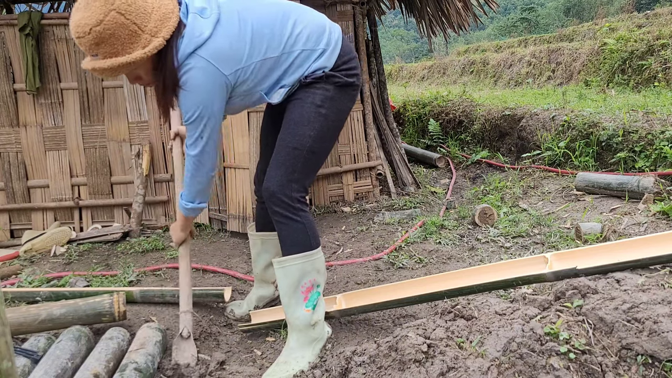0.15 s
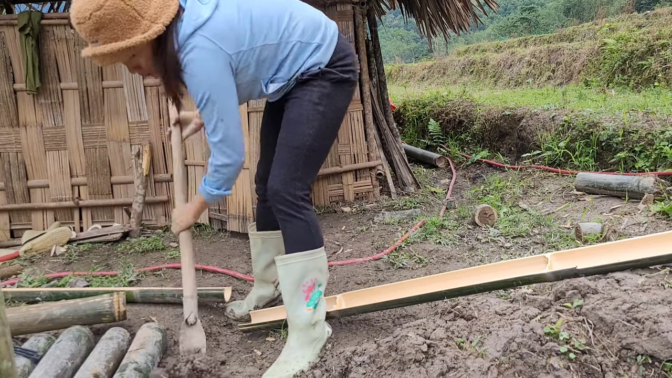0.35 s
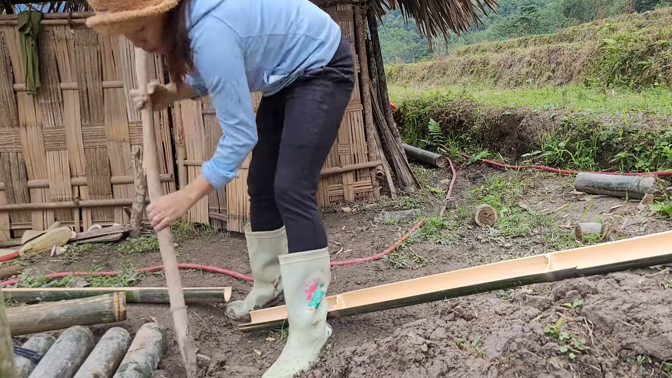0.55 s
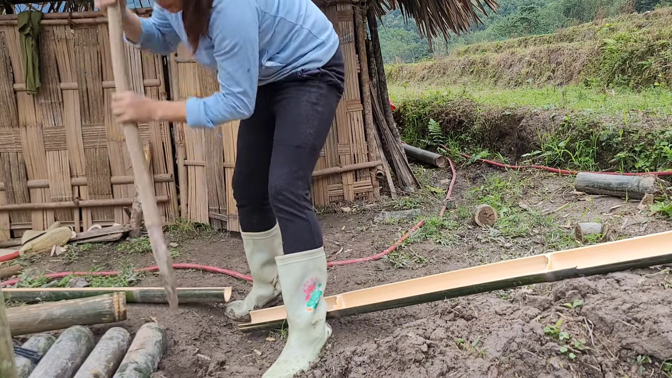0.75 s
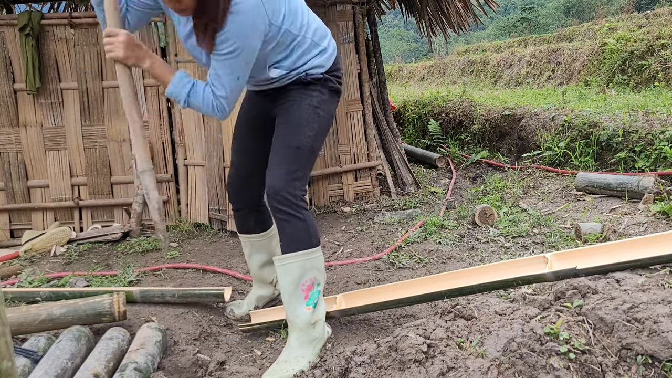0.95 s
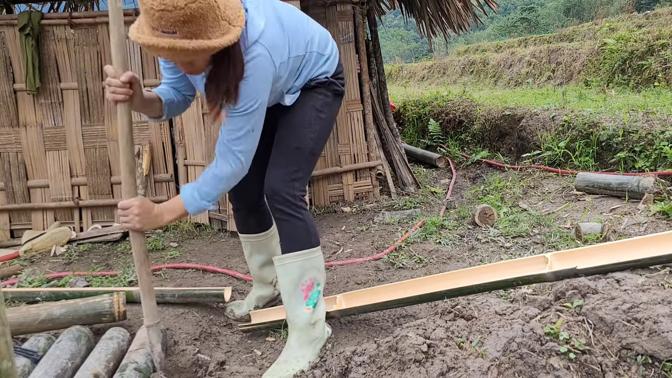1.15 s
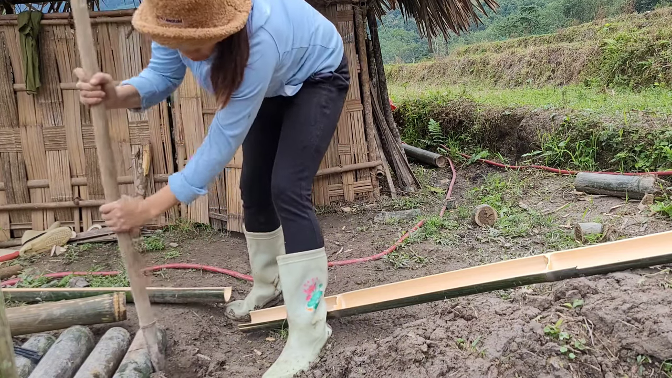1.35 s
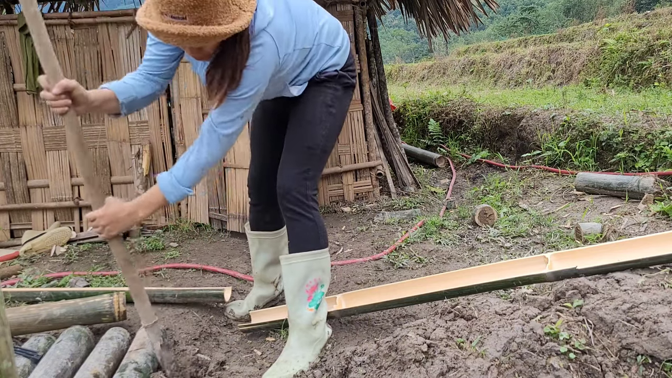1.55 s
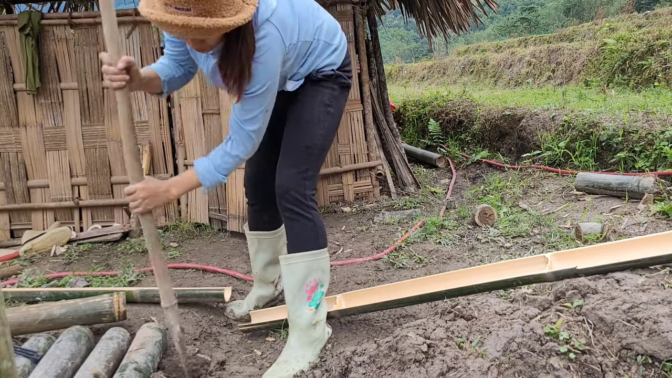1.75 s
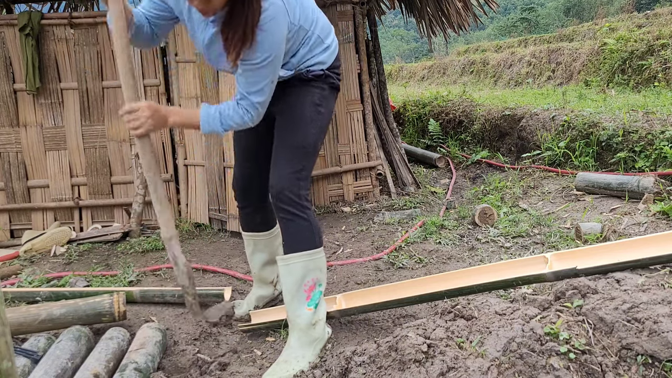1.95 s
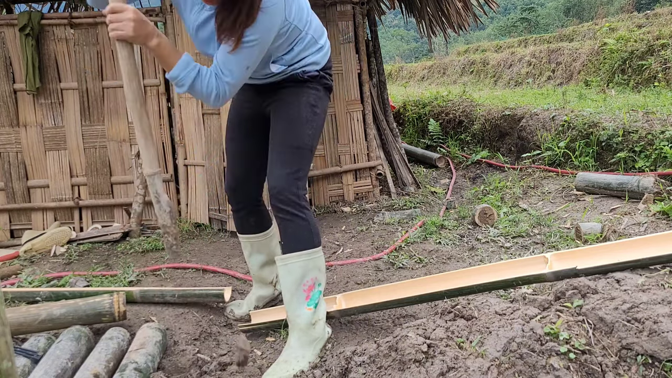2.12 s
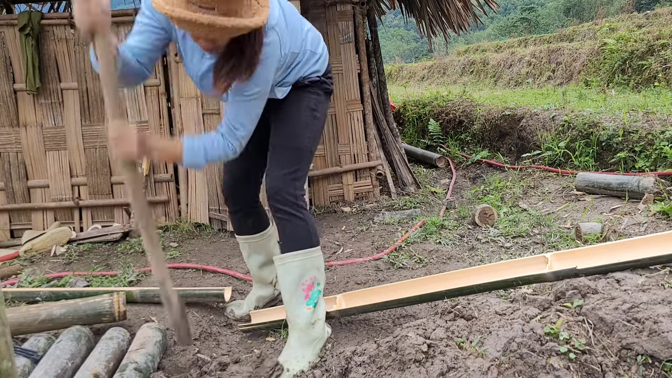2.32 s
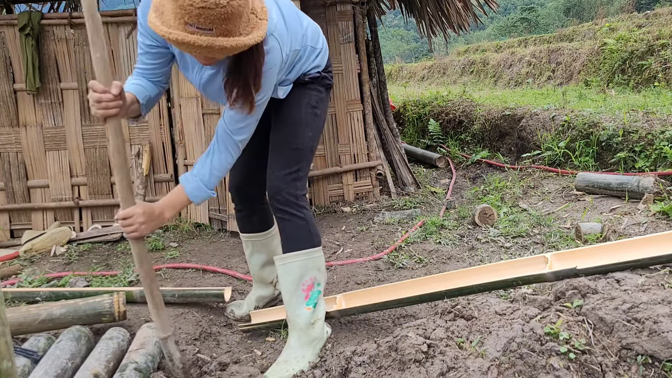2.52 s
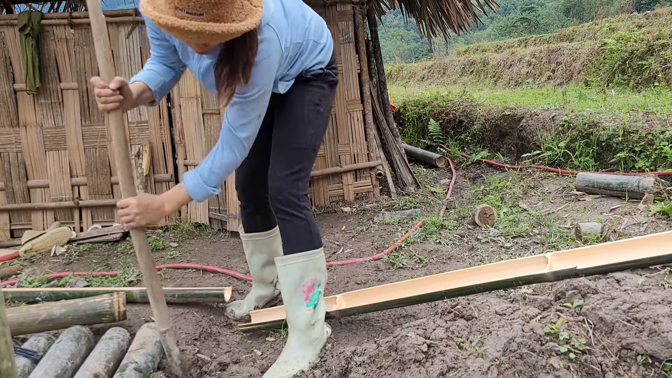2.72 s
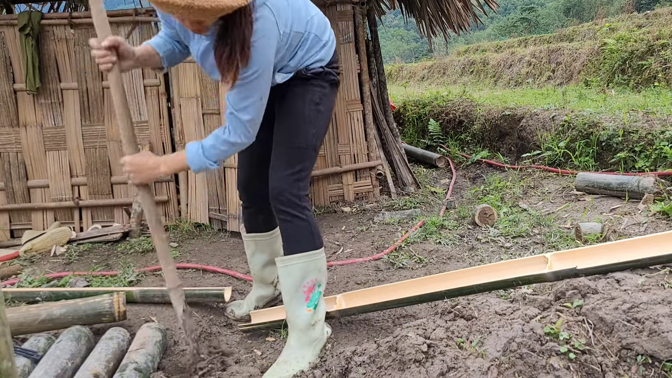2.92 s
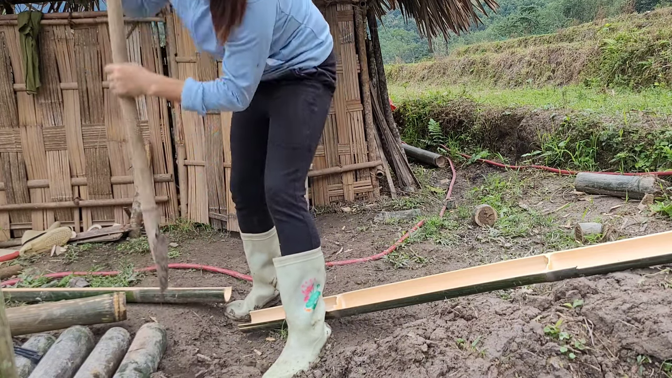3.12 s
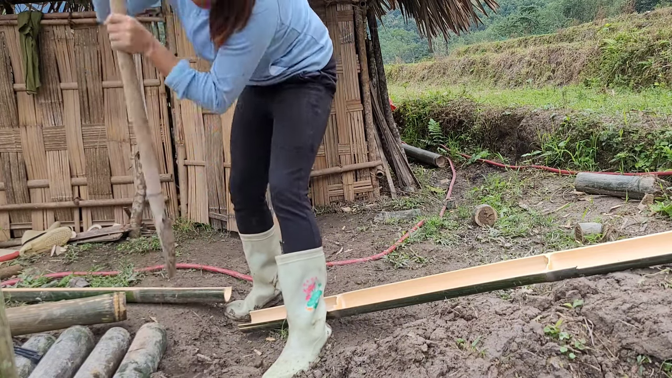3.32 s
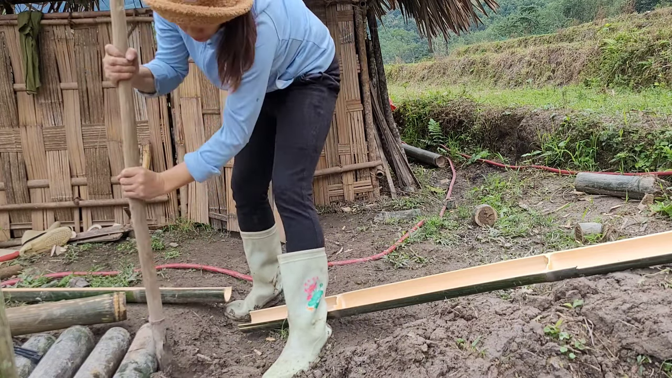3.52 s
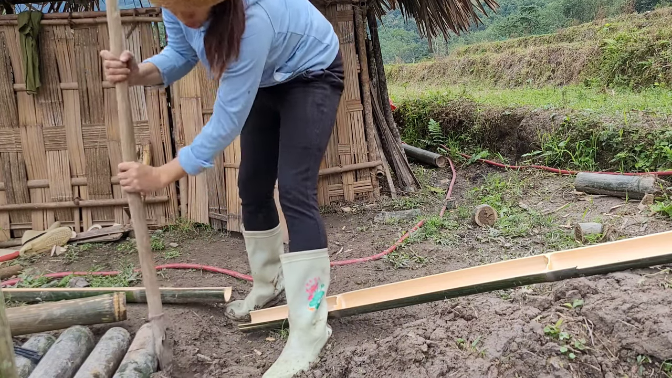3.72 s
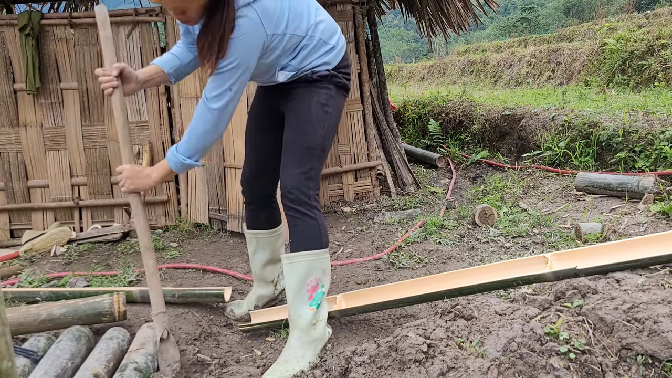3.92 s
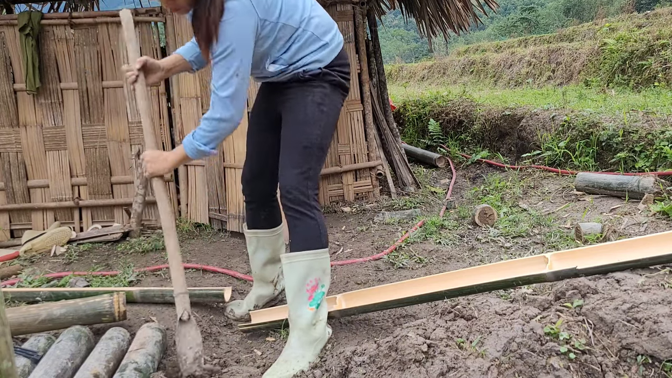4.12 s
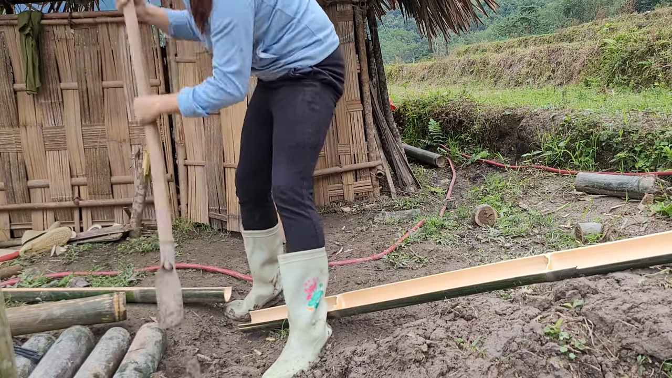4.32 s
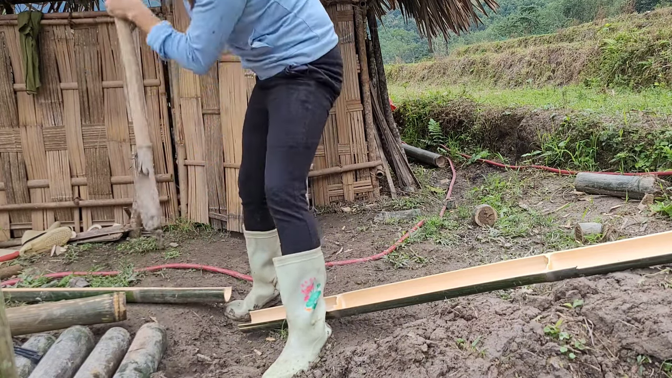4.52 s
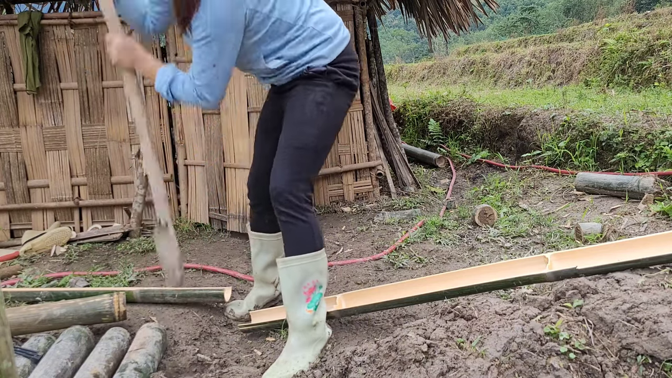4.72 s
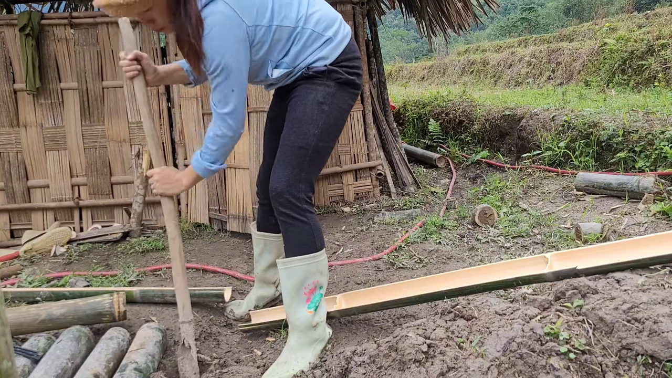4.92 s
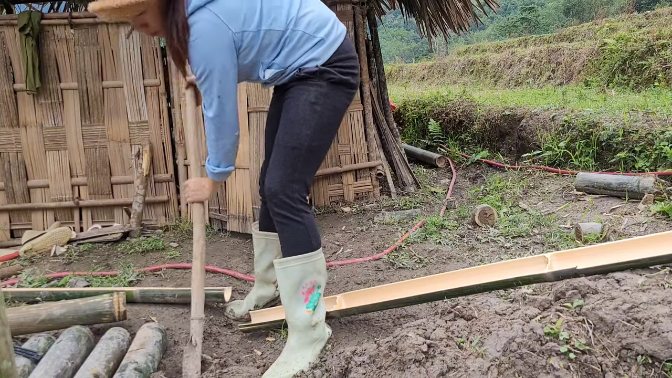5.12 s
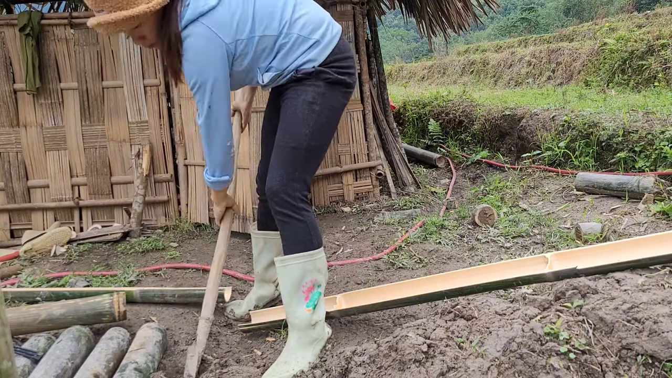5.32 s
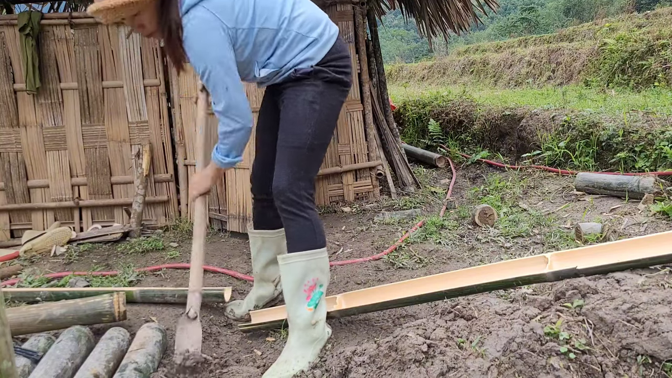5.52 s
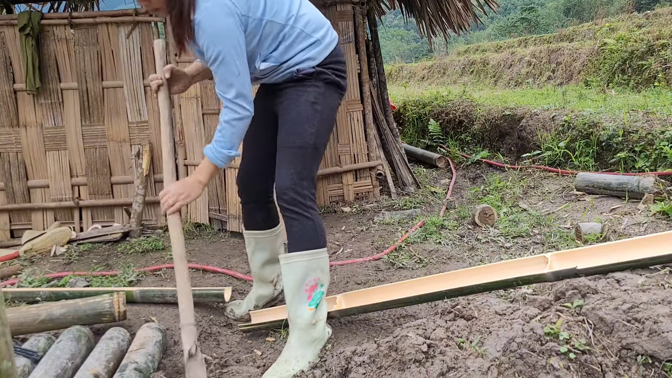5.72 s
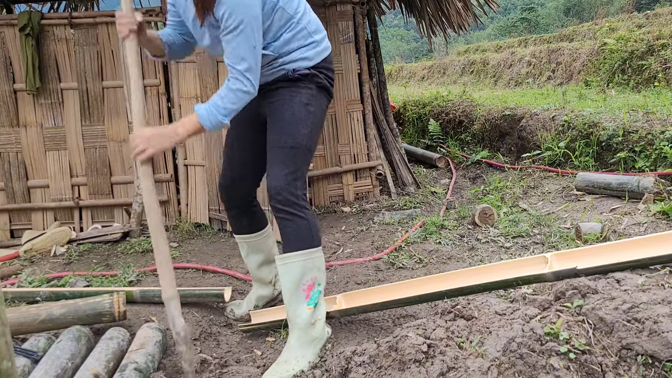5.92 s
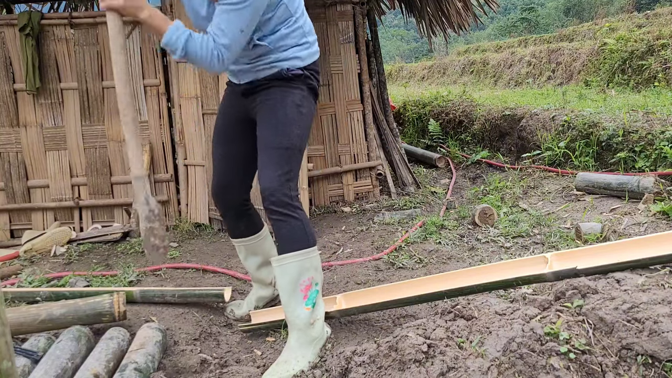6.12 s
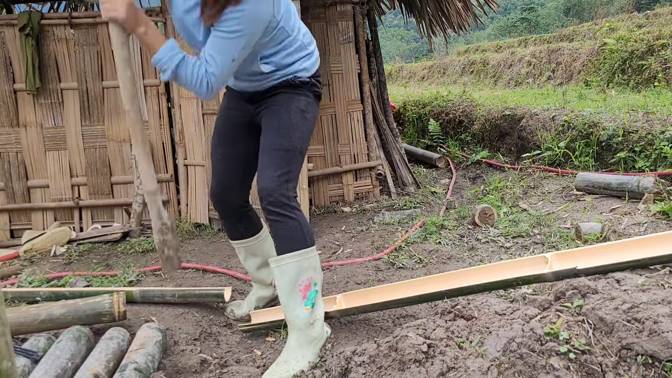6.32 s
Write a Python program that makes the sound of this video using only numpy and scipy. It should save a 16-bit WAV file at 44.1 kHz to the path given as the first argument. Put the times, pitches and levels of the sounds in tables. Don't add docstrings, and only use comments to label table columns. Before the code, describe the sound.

A digging bar is stabbed four times into damp soil with crunchy thuds and woody knocks, crumbs scattering, while a distant engine drones outdoors.

```python
import sys
import numpy as np
from scipy import signal
from scipy.fft import rfft, irfft, next_fast_len
from scipy.io import wavfile
from scipy.ndimage import uniform_filter1d, map_coordinates

SR = 44100
rng = np.random.default_rng(int(sys.argv[2]) if len(sys.argv) > 2 else 0)


def elevation(decibels):
    levels = np.asarray(decibels, float)
    return 10 ** (levels / 20)


def dump(signal):
    limited = np.clip(np.atleast_2d(signal).T, -1, 1)
    pcm = np.round(limited * 32767).astype(np.int16)
    wavfile.write(sys.argv[1], SR, pcm)


N = 280035


def unit(x):
    return x / np.sqrt(np.mean(x ** 2) + 1e-20)


def along(points, hz):
    f, v = np.transpose(points)
    return np.interp(np.log(hz + 1), np.log(f + 1), v)


def curves(rows):
    s, *cols = np.transpose(rows)
    return [np.interp(np.arange(N) / SR, s, c) for c in cols]


def wobble(rate, size=N):
    knots = rng.standard_normal(int(size * rate / SR) + 4)
    return map_coordinates(knots, [np.arange(size) * rate / SR])


def filtered(x, response):
    size = x.shape[-1]
    m = next_fast_len(size + min(4096, size))
    return irfft(rfft(x, m) * response(np.fft.rfftfreq(m, 1 / SR)), m)[..., :size]


def lead(x, samples):
    sides = np.array([[1], [-1]])
    return filtered(x, lambda hz: np.exp(1j * np.pi * hz * samples / SR * sides))


def rush(spectrum, alike, size, grit_db):
    roughness = unit(uniform_filter1d(rng.standard_normal(size), size=24))
    grit = elevation(grit_db * np.clip(roughness, -3, 3))
    pair = grit * rng.standard_normal((2, size))

    def mid_side(hz):
        turn = np.arccos(np.clip(along(alike, hz), -1, 1)) / 2
        return elevation(along(spectrum, hz)) * [np.cos(turn), np.sin(turn)]

    mid, side = filtered(pair, mid_side)
    return unit(np.array([mid + side, mid - side]))


def patchy(x, depth_db):
    z = signal.stft(x, nperseg=256)[2]
    field = uniform_filter1d(rng.standard_normal(z.shape[1:]), size=9, axis=0)
    field = uniform_filter1d(field, size=14, axis=1)
    return unit(signal.istft(z * elevation(depth_db * unit(field)), nperseg=256)[1][:, :N])


def add(out, s, x):
    part = out[:, round(s * SR):][:, :x.shape[-1]]
    part += x[..., :part.shape[-1]]


# touch_s, slide_s, crush_s, crush_db, slide_db
JABS = [
    (1.107, 0.0085, 0.0094, -25.5, -12),
    (2.3556, 0.0012, 0.007, -17.5, -19),
    (3.4341, 0.0022, 0.015, -24, -9.5),
    (4.79, 0.0039, 0.01, -24.5, -14),
]
# freq_hz, density_db
CRUSH_COLOUR = [
    [(410, -12.5), (700, -10), (1440, -12), (1920, -10.5), (3370, -14.5), (6230, -19), (7590, -15),
     (8650, -25.5), (16000, -26)],
    [(410, -26), (700, -4.5), (1420, -14), (2660, -2.5), (4050, -7.5), (5330, -8), (5690, -12), (6830, -7),
     (16000, -17)],
    [(410, -25), (700, -6), (2490, -21), (2840, -21), (3280, -24.5), (5760, -22.5), (9730, -32),
     (13000, -27), (16000, -32)],
    [(410, -37), (700, -8.5), (2130, -3), (2490, -15), (3200, -2), (4920, -13.5), (7690, -12), (8420, -13),
     (16000, -9)],
]
# freq_hz, density_db
THUD_COLOUR = [
    [(65, -21.5), (110, 7), (194, -3), (462, 7), (748, -7), (800, -13), (1100, -15.5), (1430, -25.5),
     (2420, -120)],
    [(65, -34.5), (110, -10.5), (324, -5), (524, -3.5), (648, -18), (1020, -25), (1100, -15), (1430, -47),
     (2420, -120)],
    [(65, -54), (110, -32), (242, 1.5), (453, 3.5), (582, -9), (748, -8), (1100, -35), (1430, -52.5),
     (2420, -120)],
    [(65, -52), (110, -5), (178, -12), (257, -10), (340, -11), (480, -17.5), (1100, -28), (1430, -51.5),
     (2420, -120)],
]
# pitch_hz, level_db, t60_s
RING_MODES = [
    [(275.15, -1.5, 0.13), (483, -6, 0.2), (760, -13, 0.025), (1900, 15, 0.028)],
    [(170, -7, 0.08), (313.2, -5, 0.13), (407, 0.5, 0.064), (660, 1.5, 0.022)],
    [(245.6, 1, .1), (295.7, -7, 0.1465), (331.2, -10.5, 0.12), (409.4, -6.5, 0.22), (449, -5, 0.17),
     (528.5, -1, .1), (690, 0.5, 0.063)],
    [(250, -5, 0.06), (470, -1.5, 0.052), (746, 4, 0.017)],
]
# ring_db, thud_db, thud_t60_s, thud_delay_s, spray_db
AFTERMATH = [
    (-31, -35, 0.18, 0.002266, -9),
    (-25, -28, 0.11, 0.0017, -11.5),
    (-19, -23.5, 0.2, 0.0011, -6.5),
    (-22.5, -38.5, 0.14, 0.00503, -6),
]
# pitch_hz, level_db, t60_s
HANDLE_MODES = [(727, -8, .1), (915, -14.5, .11), (1100, -9.5, .065), (1242, -12, .07)]
HANDLE_DRIVE = [-1.5, -10, 0.5, -12]
# freq_hz, likeness (0 to 1)
NEAR_ALIKE = [(300, 0.99), (1000, 0.8), (4000, 0.33), (10000, 0.038)]


def jabs():
    out, t = np.zeros((2, N)), np.arange(SR // 2) / SR
    blows = zip(JABS, CRUSH_COLOUR, THUD_COLOUR, RING_MODES, AFTERMATH, HANDLE_DRIVE)
    for jab, colour, dull, modes, aftermath, drive_db in blows:
        s, slide, crush, db, slide_db = jab
        ring_db, thud_db, thud_t60, delay, spray_db = aftermath

        after = np.maximum(t - slide - crush, 0)
        knots = np.cumsum([0, slide, .0012, 0.26 * crush, 0.83 * crush])
        burst = np.interp(t, knots, [0.47 * elevation(slide_db), elevation(slide_db), .7, 1.3, .6])
        burst = burst * elevation(-60 * after / 0.039)
        add(out, s, elevation(db) * burst * rush(colour, NEAR_ALIKE, len(t), grit_db=1.5))

        spray = elevation(spray_db - 60 * after / .12 + 2.5 * wobble(140, size=len(t))) * (t > slide)
        loose = rush(colour, NEAR_ALIKE, len(t), grit_db=4)
        loose = filtered(loose, lambda hz: 1 / (1 + (hz / 14000) ** 2))
        add(out, s, elevation(db) * spray * loose)

        ring = np.zeros(len(t))
        for hz, level, t60 in modes + [(hz, level + drive_db, t60) for hz, level, t60 in HANDLE_MODES]:
            fade = elevation(level - 60 * t / t60 + 2.1 * wobble(60, size=len(t)))
            build = (1 - np.exp(-t * hz / 0.27)) ** 2
            ring += fade * build * np.sin(2 * np.pi * (hz * t + rng.random()))
        thud = elevation(thud_db - 60 * after / thud_t60) * (1 - np.exp(-t / 0.00059))
        thud = thud * rush(dull, NEAR_ALIKE, len(t), grit_db=-2.0)
        add(out, s + slide + delay, elevation(ring_db) * ring + thud)
    return out


# pitch_hz, level_db, peak_s
BOUNCE = [
    (63, -36, 0.015),
    (63.3, -33, 0.025),
    (71.1, -35.5, 0.0233),
    (61.4, -28, 0.0236),
]


def bounce():
    out, t = np.zeros((2, N)), np.arange(SR // 3) / SR
    for (s, slide, *_), (hz, db, peak) in zip(JABS, BOUNCE):
        swell = (t / peak * np.exp(1 - t / peak)) ** 2
        swing = np.sin(2 * np.pi * (hz * t + rng.random()))
        add(out, s + slide + 0.0051, elevation(db) * swell * swing)
    return lead(out * elevation([[-.7], [.7]]), samples=38)


# start_s, length_s, cloth_db, earth_db
STROKES = [(.0, 0.11, -64, -63), (0.507, 0.27, -60, -88), (1.204, 0.4, -84, -64), (1.636, 0.074, -76, -71),
           (1.878, 0.087, -72, -71.5), (1.961, 0.14, -58, -75), (2.116, 0.15, -91, -73),
           (2.395, 0.16, -65.5, -72.5), (2.69, 0.14, -63.5, -71), (2.879, 0.029, -57, -56),
           (2.915, 0.19, -61, -101), (3.152, 0.17, -66, -90.5), (3.572, 0.14, -65.5, -58),
           (3.672, 0.18, -59, -53), (3.862, 0.073, -81, -59.5), (3.95, 0.088, -74, -69),
           (4.066, 0.052, -66, -70.5), (4.186, 0.17, -60.5, -76.5), (4.384, 0.12, -68, -85),
           (4.858, 0.29, -67.5, -70), (5.069, 0.22, -70.5, -68), (5.271, 0.1, -76.5, -79),
           (5.691, 0.057, -57.5, -71.5), (5.729, 0.051, -50.5, -64.5), (5.759, 0.2, -63.5, -71),
           (5.92, 0.19, -61.5, -74.5), (6.09, .1, -101, -75.5)]
# freq_hz, density_db
CLOTH_COLOUR = [(880, -49), (1500, -20.5), (2100, -3.5), (2300, -16.5), (2570, -3.5), (3260, -0.5),
                (4910, 1), (8740, -4.5), (15100, -5), (16200, -24)]
# freq_hz, density_db
EARTH_COLOUR = [(300, -25.5), (480, -2), (1200, -2.5), (2200, -4), (3800, -8.5), (5600, -15), (7500, -8),
                (8700, -24.5), (16000, -45)]
SWELL, TRAIL = .47, 0.21
RESTLESS_DB, LINGER_DB, LINGER_S = -79, -21.5, 0.27


def stirring():
    effort = np.zeros((2, N))
    for s, length, cloth_db, earth_db in STROKES:
        end = (1 + TRAIL) * length
        t = np.arange(round(end * SR)) / SR
        phase = np.interp(t, [0, SWELL * length, end], [np.pi / 8, np.pi / 2, 0])
        add(effort, s, elevation([[cloth_db], [earth_db]]) * np.sin(phase) ** 2)
    linger = signal.lfilter([1], [LINGER_S * SR, 1 - LINGER_S * SR], effort[0] + effort[1])
    effort[0] += elevation(RESTLESS_DB) + elevation(LINGER_DB) * linger
    cloth = patchy(rush(CLOTH_COLOUR, [(2000, 0.48), (10000, 0.1)], N, grit_db=2.5), depth_db=3)
    earth = patchy(rush(EARTH_COLOUR, NEAR_ALIKE, N, grit_db=3.8), depth_db=2.5)
    return effort[0] * elevation(0.44 * wobble(32)) * cloth + effort[1] * elevation(1.5 * wobble(27)) * earth


# start_s, peak_db, centre_hz
CRACKS = [
    (1.1156, -32, 6740),
    (1.118, -25, 4770),
    (2.356, -18, 6610),
    (3.4386, -23.5, 5620),
    (4.793, -37, 7120),
    (4.7937, -17.5, 10000),
]
# start_s, peak_db, centre_hz
CRUMBS = [(0.1123, -50.5, 8100), (0.29, -52, 14400), (0.3232, -52, 11500), (0.532, -42, 10100),
          (0.5566, -44, 6900), (1.258, -53.5, 7450), (1.6405, -54, 12800), (1.7357, -55.5, 9530),
          (1.93, -44.5, 4425), (1.9734, -54, 5020), (2.1307, -45, 4900), (2.186, -51, 5140),
          (2.434, -47, 6680), (2.6045, -52, 6330), (2.8196, -49.5, 9660), (3.5978, -53, 6620),
          (3.7733, -37, 4956), (3.9776, -47, 14800), (4.0816, -47, 8300), (4.955, -45.5, 9040),
          (5.011, -52, 12480), (5.7038, -40, 7370), (5.746, -39, 4640), (5.8849, -41.5, 12100),
          (5.906, -49, 11940), (6.181, -54.5, 14600), (6.245, -54.5, 10100)]
# start_s, peak_db, centre_hz
MORE_CRUMBS = [(0.0298, -50, 15100), (0.2094, -52, 4100), (0.7581, -49, 15400), (0.8415, -57, 9660),
               (1.2744, -57, 7500), (1.3653, -52, 6380), (1.6227, -57, 10600), (1.6696, -55, 11800),
               (1.6994, -62, 4020), (1.7444, -61, 7230), (1.8094, -67, 4807), (1.8776, -58, 11000),
               (2.1494, -56, 7990), (2.2358, -55, 12520), (2.2588, -53, 13900), (2.2764, -57, 6890),
               (2.3052, -53, 10900), (2.6808, -53, 12500), (2.7257, -54.5, 7970), (3.5049, -49, 14830),
               (3.7184, -55, 7090), (3.8701, -56, 5530), (3.894, -53, 5490), (4.6399, -56, 14830),
               (4.6872, -55, 12800), (4.9153, -56, 4000), (5.116, -58, 7280), (5.8162, -53, 7220),
               (6.1365, -63, 4857)]


def crumbs():
    out, t = np.zeros((2, N)), np.arange(400) / SR
    faint = rng.random((220, 3)) * [(N - 500) / SR, 10, 9000] + [0, -74, 6000]
    for s, db, hz in [*CRACKS, *CRUMBS, *MORE_CRUMBS, *faint]:
        snap = filtered(rng.standard_normal((2, len(t))), lambda f: np.exp(-(np.log((f + 1) / hz) / .3) ** 2))
        wide = filtered(rng.standard_normal((2, len(t))), lambda f: f > 3500)
        body = elevation(-60 * t / 0.012) * (1 - np.exp(-t / 0.00063)) * unit(snap[0] + .6 * snap)
        tick = .5 * elevation(-60 * t / .005) * unit(wide[0] + .6 * wide)
        add(out, s, elevation(db - 2.5 + np.array([[1.5], [-1.5]])) * (body + tick))
    return out


# start_s, peak_db, pitch_hz
PLINKS = [(0.2992, -60, 1970), (0.3234, -52.5, 2830), (0.435, -41.5, 1860), (1.254, -53, 1980),
          (1.3671, -47, 1900), (1.8335, -47, 1900), (2.187, -53.5, 2965), (2.307, -55, 2720),
          (2.4721, -52, 1520), (2.7684, -55, 4130), (2.919, -50, 1490), (3.56, -56.5, 2040),
          (3.9475, -56, 2625), (3.985, -46, 1437), (3.998, -48, 1420), (4.772, -56, 2050),
          (5.7063, -53, 2040), (5.74, -56.5, 1950), (5.7544, -44.5, 1400), (5.758, -48, 1940),
          (5.775, -48, 1924), (5.806, -51, 1497), (5.818, -51.5, 1495), (5.885, -59.5, 2050),
          (6.0, -59, 2526), (6.04, -63, 2017)]
# start_s, peak_db, pitch_hz
BOOTS = [
    (2.133, -44.5, 310),
    (2.195, -46.5, 285),
    (5.099, -65, 276),
    (6.176, -49, 288),
]
# start_s, peak_db, pitch_hz
CLACK = [
    (2.883, -35.5, 3660),
    (2.887, -50, 3700),
    (2.885, -49.5, 1900),
    (2.895, -42, 3150),
    (2.895, -45, 2590),
]
DRIPS, DRIP_HZ, DRIP_SPREAD_HZ, DRIP_DB = 170, 1930, 70, -8.5


def plinks():
    out, t = np.zeros((2, N)), np.arange(SR // 16) / SR
    when, size = rng.random(DRIPS) * (N / SR - .1), rng.standard_normal((DRIPS, 2))
    drip_db = DRIP_DB + np.interp(when, *np.transpose(CARRY)) + 2 * size[:, 0]
    drips = zip(when, drip_db, DRIP_HZ + DRIP_SPREAD_HZ * size[:, 1])
    for s, db, hz in [*PLINKS, *BOOTS, *CLACK, *drips]:
        drift = 0.059 * np.cumsum(rng.standard_normal(len(t)))
        dull_noise = filtered(rng.standard_normal(len(t)), lambda f: f < 3 * hz)
        tap = 0.32 * elevation(-60 * t / 0.0058) * dull_noise
        fade = elevation(-60 * t / (.018 + 12 / hz)) * (1 - np.exp(-t / 0.0011))
        add(out, s, elevation(db + 2.0) * (tap + fade * np.sin(2 * np.pi * hz * t + drift)))
    return out


# start_s, length_s, first_pitch_hz, last_pitch_hz, level_db
CHIRPS = [(.135, .055, 3400, 2720, -60), (.33, .03, 2200, 2250, -66), (.37, .055, 2250, 2650, -59),
          (.412, .12, 2550, 3520, -50), (.51, .08, 3520, 3560, -58), (.58, .03, 2900, 2500, -57),
          (.59, .03, 2600, 3500, -62), (.632, .045, 3600, 3200, -51), (.665, .035, 4450, 4250, -58),
          (.675, .095, 3250, 2880, -55), (.71, .04, 2800, 4000, -55), (2.495, .05, 2050, 2180, -59),
          (2.52, .085, 2150, 2380, -55), (2.6, .06, 2300, 2380, -64), (2.572, .1, 2600, 2950, -56),
          (2.6, .05, 2950, 3350, -59), (2.628, .05, 3150, 2550, -58), (2.66, .06, 2650, 2500, -56),
          (2.65, .125, 2900, 2950, -66), (2.69, .1, 2600, 2150, -65), (2.71, .13, 2550, 2560, -72),
          (4.37, .1, 2550, 3000, -73), (4.495, .055, 2750, 2450, -73), (4.535, .06, 2500, 1800, -70),
          (4.66, .03, 2600, 2950, -73), (4.685, .07, 2450, 2550, -74), (6.25, .1, 2300, 2750, -77)]
ATTACK_S, RELEASE_S, GLIDE_S, NOTE_SAG_DB, BIRD_DB = .014, .012, .045, -8, -1


def bird():
    song = np.zeros((1, N))
    for s, length, first_hz, last_hz, db in CHIRPS:
        t = np.arange(round(length * SR)) / SR
        flutter_db = 2 * wobble(130, size=len(t)) + 1.2 * wobble(40, size=len(t))
        waver = .018 * wobble(420, size=len(t))
        fade = np.clip(np.minimum(t / ATTACK_S, (length - t) / RELEASE_S), 0, 1)
        fade = fade * elevation(NOTE_SAG_DB * t / length)
        glide = (1 - np.clip(t / min(length, GLIDE_S), 0, 1)) ** 2
        hz = last_hz + (first_hz - last_hz) * glide
        whistle = np.sin(2 * np.pi * np.cumsum(hz * (1 + waver)) / SR)
        add(song, s, fade * elevation(db + BIRD_DB + flutter_db) * whistle)
    return song * elevation([[-1.2], [1.2]])


# freq_hz, t60_s
HUT_DECAY = [(200, 0.12), (2000, 0.048), (10000, 0.18)]


def hut(x, linger):
    hz, t, z = signal.stft(rng.standard_normal((2, SR // 2)), SR, nperseg=256)
    decay = elevation(-60 * t / (linger * along(HUT_DECAY, hz)[:, None]))
    tail = signal.istft(z * decay, SR, nperseg=256)[1]
    delayed = np.pad(x, ((0, 0), (300, 0)))
    return signal.fftconvolve(delayed, tail / np.linalg.norm(tail[0]), axes=1)[:, :N]


# time_s, firing_rate_hz, firing_db, lope_db
ENGINE = [(0, 127, -44.5, -62), (.4, 123.6, -64, -71), (.65, 132.3, -44.5, -61), (.85, 134.6, -59, -67.5),
          (1.1, 140.1, -51, -74.5), (1.7, 150.5, -47, -60), (1.9, 152, -84, -89.5),
          (2.65, 153.4, -55.5, -77.5), (2.9, 153.1, -71, -77), (3.1, 153.5, -50.5, -67.5),
          (3.7, 147.1, -54, -60), (4.5, 138.7, -64, -67), (4.95, 134.4, -56.5, -59),
          (5.3, 136.4, -66.5, -76), (5.7, 124.7, -71.5, -68), (6, 116.9, -58.5, -63.5),
          (6.35, 112.3, -56.5, -67.5)]
# time_s, level_db
CARRY = [(0, -60.5), (.26, -64), (.63, -58.5), (2.78, -62), (3.61, -63), (4.6, -67), (5.02, -66),
         (5.27, -69.5), (6.35, -66)]
# freq_hz, density_db
DRONE_COLOUR = [(53, -41), (90, -13), (102, -18.5), (116, -7), (139, -1), (206, -10.5), (273, -7),
                (703, -30.5), (1000, -31.5), (1300, -67), (2200, -120)]
# freq_hz, density_db
RUMBLE_COLOUR = [(13, -57), (22, -16), (54, 0.5), (72, 1), (92, -21), (110, -20), (140, -56.5), (240, -120)]
# freq_hz, density_db
STREAM_COLOUR = [(290, -28.5), (500, -3.5), (953, -6.5), (1960, -9.5), (3470, -19), (4010, -19),
                 (4500, -37.5), (5000, -31.5), (6500, -69), (11000, -120)]
# freq_hz, likeness (0 to 1)
FAR_ALIKE = [(60, 0.69), (200, .93), (700, 0.85), (2000, 0.29)]
STREAM_DB, STREAM_GROWS, RUMBLE_DB, RUMBLE_GROWS = -71.5, 1.3, -68.5, 0.5


def valley():
    hz, firing_db, half_db = curves(ENGINE)
    drone_db, = curves(CARRY)
    stream_db = STREAM_DB + STREAM_GROWS * (drone_db - drone_db.mean())
    rumble_db = RUMBLE_DB + RUMBLE_GROWS * (half_db - half_db.mean())
    tone = np.zeros(N)
    orders = [(1, firing_db), (.5, half_db), (2, firing_db - 12.0), (3 / 2, half_db - 6.0)]
    for order, db in orders:
        phase = 2 * np.pi * np.cumsum(order * hz * (1 + .03 * wobble(25))) / SR
        tone += elevation(db - 1.5 + 2.7 * wobble(12)) * np.sin(phase)
    drone = elevation(drone_db + 4.0 + 0.42 * wobble(1.0)) * rush(DRONE_COLOUR, FAR_ALIKE, N, grit_db=0.8)
    stream = elevation(stream_db + 0.5 + 0.42 * wobble(14)) * rush(STREAM_COLOUR, FAR_ALIKE, N, grit_db=1.5)
    rumble = elevation(rumble_db + 1.3 * wobble(4)) * rush(RUMBLE_COLOUR, FAR_ALIKE, N, grit_db=2.0)
    return tone + drone + stream + rumble


# freq_hz, density_db
HISS_COLOUR = [(1180, -48), (2000, -34.5), (2490, -2), (3300, -13.5), (5120, -33.5), (6480, -10),
               (8660, -18), (11800, -5.5), (16300, -17.5)]


def hiss():
    return elevation(-83) * rush(HISS_COLOUR, [(2000, 0.93)], N, grit_db=8)


def scene():
    blows, song, taps = jabs(), bird(), plinks()
    near = blows + elevation(-19) * hut(blows, linger=.8) + stirring() + crumbs()
    echoes = elevation(-6) * hut(taps, linger=1.2) + elevation(-2) * hut(song, linger=2.8)
    far = valley() + song + taps + echoes
    return lead(near, samples=5.5) + lead(far, samples=19) + bounce() + hiss()


def roll_off(x):
    return signal.sosfilt(signal.butter(12, 16970, fs=SR, output="sos"), x)


# freq_hz, left_over_right_db
LEFT_PORT = [(200, -1), (1300, -1.5), (4400, 0), (8000, 1), (15000, 12.5)]


def record(dry):
    def port_response(hz):
        top = elevation(along([(15700, 0), (16100, -25.0), (16900, -70.5)], hz))
        bass_cut = 1 / (1 + (34 / (hz + 1)) ** 6)
        return top * bass_cut * elevation(along(LEFT_PORT, hz) * np.array([[.5], [-.5]]))

    mix = filtered(dry, port_response)
    return roll_off(mix)


dry = scene()
out = record(dry)
dump(out)
```